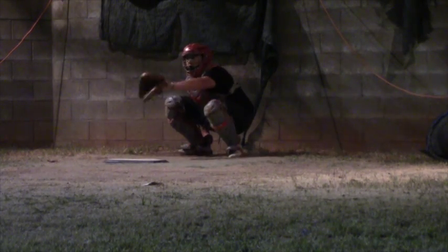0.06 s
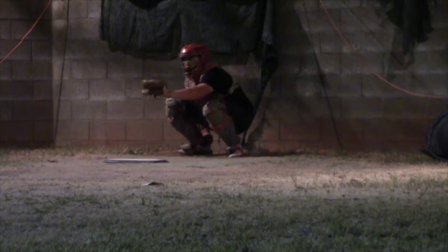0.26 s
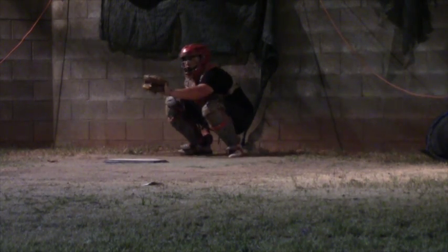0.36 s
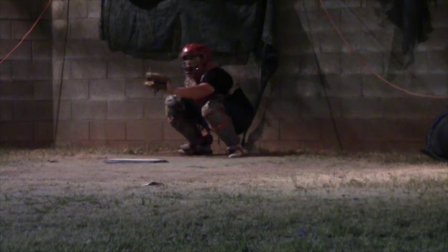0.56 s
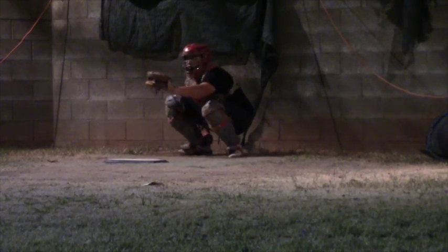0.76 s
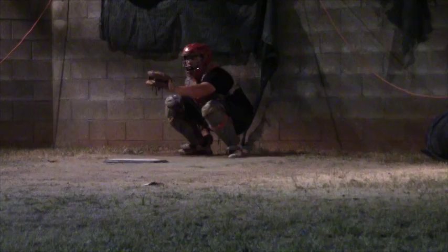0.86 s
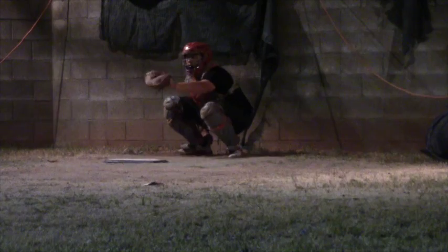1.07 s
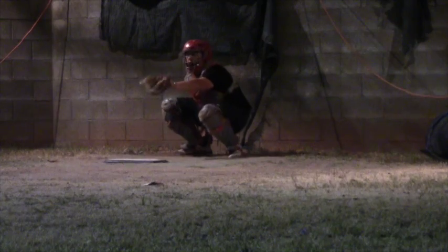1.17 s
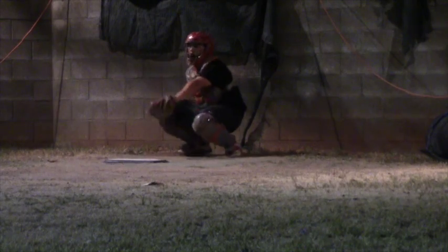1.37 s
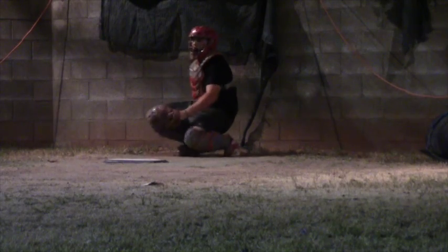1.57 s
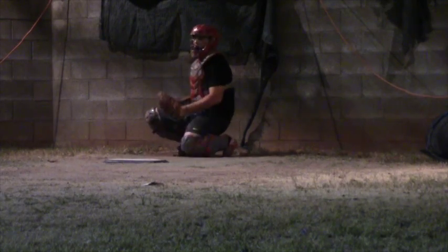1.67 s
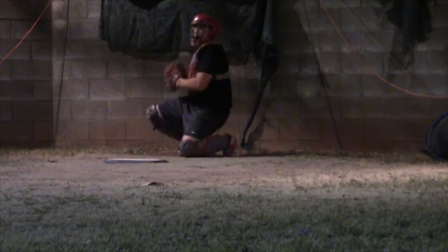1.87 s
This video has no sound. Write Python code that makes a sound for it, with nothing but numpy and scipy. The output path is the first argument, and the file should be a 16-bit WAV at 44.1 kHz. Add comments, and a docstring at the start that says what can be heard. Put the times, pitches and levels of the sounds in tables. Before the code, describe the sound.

Quiet outdoor night hiss with faint crickets, then one sharp baseball-in-mitt pop echoing briefly off ground and wall, followed by small dull gear clacks and tiny cloth rustles, heard from across a yard in stereo.

```python
"""Outdoors at night, crickets (wavering sine chirps, narrow-band noise) sound over distant rumble and hiss (noise).
Then a baseball hits a leather mitt beside a block wall: choked sines thump and snap, noise bursts crack.
Ground and wall repeat it as further rows; the yard scatters it back as lumpy noise; the extra hiss stops.
Light knocks of hard gear (choked sines, noise grain, a short room tail) and rustles (noise bursts) follow."""
import sys
import numpy as np
from scipy import signal
from scipy.fft import rfft, irfft, next_fast_len
from scipy.io import wavfile
from scipy.ndimage import map_coordinates

SR = 44100
rng = np.random.default_rng(int(sys.argv[2]) if len(sys.argv) > 2 else 0)


def int16_out(signal):
    """Quantize to a 16-bit WAV file."""
    q = np.round(np.clip(np.atleast_2d(signal).T, -1, 1) * 32767)
    wavfile.write(sys.argv[1], SR, q.astype(np.int16))


N = 83790

# Night noise colour. Each row: frequency in Hz, relative level in dB.
NIGHT_COLOUR_DB = [(12, -68), (20, -54), (60, -21.5), (120, -4), (172, -6.5), (330, -8.5), (459, -12.5),
                   (574, -14), (802, -17.5), (1810, -26.5), (5680, -36.5), (11100, -42), (16000, -54.5)]
# Night stereo width. Each row: frequency in Hz, side level relative to mid in dB.
NIGHT_SIDE_DB = [(30, -2), (60, -26), (150, -22), (380, -13.5), (950, -11), (2400, -8.5), (3500, -15),
                 (6000, -41), (10000, -11), (15000, -22)]
# Chirps of the nearest cricket. Each row: start in seconds, rms level in dB.
CHIRPS = [(0, -67.5), (.066, -73), (.968, -69.5), (1.052, -70), (1.385, -73), (1.652, -71), (1.718, -70),
          (1.803, -70)]
# Thumps of the mitt's pocket, direct and off ground and walls.
# Each row: start in seconds, peak in dB before filtering, pitch in Hz, ring in cycles.
THUMPS = [(.2372, -7, 388, 1.4), (.2405, -1.5, 626, 1.96), (.2435, -8, 215, 0.74), (.2478, -9, 545, 2.1),
          (.2497, -4, 577, 1.14), (.2535, -12.5, 643, 5.1), (.2630, -28, 625, 1.3),
          (.2677, -13.5, 690, 0.91), (.2745, -22, 423, 1.6), (.2803, -16, 320, 0.72),
          (.3468, -18.5, 523, 1.76), (.3500, -21, 256, 3)]
# Sharp snaps of the leather, direct and off the wall.
# Each row: start in seconds, peak in dB before filtering, pitch in Hz, ring in cycles.
SNAPS = [(.2374, -17.5, 4340, 3.1), (.2404, -5, 3720, 2.7), (.2536, -1, 5530, 0.31)]
# Leather cracks, direct and echoed. Each row: start in seconds, level in dB before envelope and air loss,
# centre in Hz, width in octaves, length in seconds.
CRACKS = [(.2370, -24, 7000, 1.1, 0.00058), (.2390, -20, 4400, 1.2, 0.0046),
          (.2478, -22, 3430, 0.74, 0.0025), (.2538, -18, 6000, 1.2, 0.0012),
          (.2613, -27, 9250, 0.26, 0.0014), (.2650, -26.5, 2820, 0.43, 0.0026),
          (.2690, -34.5, 8550, 0.47, 0.0036), (.4238, -45.5, 7600, 0.14, 0.0016),
          (.4243, -40, 4640, 0.11, 0.0016), (.4200, -55, 5840, 0.47, 0.029),
          (.4340, -45.5, 2600, 0.59, 0.041)]
# Scattered echoes of the catch. Each row: time in seconds, low, mid and treble band levels in dB.
YARD_LEVELS = [(0.236, -36, -26.5, -50), (0.253, -25.5, -31, -34), (0.272, -22.5, -32, -42.5),
               (.304, -33.5, -43.5, -54), (.336, -32.5, -40.5, -57), (.375, -34.5, -44, -59.5),
               (0.444, -41.5, -51.5, -61), (.460, -48, -55.5, -66), (0.552, -55, -57.5, -84),
               (.750, -50.5, -63.5, -92), (.95, -52.5, -63.5, -94), (1.199, -61, -75, -100)]
# Colours of those three bands. Each row: frequency in Hz, relative level in dB.
YARD_LOW_DB = [(59, -55), (100, -16), (254, -4), (355, -8), (607, -6), (1300, -38.5), (1690, -65),
               (2860, -120)]
YARD_MID_DB = [(710, -23), (1200, -10.5), (3430, -11), (5500, -24.5), (7150, -31), (12100, -120)]
YARD_TREBLE_DB = [(3500, -51), (5200, 0.5), (8000, -4), (10500, -9.5), (12500, -25), (15500, -23)]
# Echo stereo width. Each row: frequency in Hz, side level relative to mid in dB.
ECHO_SIDE_DB = [(60, -25), (200, -36), (700, -23), (1600, -25), (4000, -27), (12000, -43)]
# Light knocks of hard gear.
# Each row: start in seconds, peak in dB before filtering, pitch in Hz, ring in cycles.
KNOCKS = [(0.5687, -32, 1480, 2.7), (0.5701, -21, 926, 1.8), (0.5733, -22, 450, 0.63),
          (0.5856, -24.5, 660, 1.2), (.5905, -28.5, 595, 2.2), (0.6098, -39.5, 2350, 0.69),
          (0.6098, -14, 906, 1.02), (.6118, -45, 990, 3), (0.6121, -21.5, 243, 1.74),
          (0.6142, -18.5, 450, 1.37), (0.635, -37, 625, 4), (0.647, -30, 302, 1.3), (0.672, -36, 530, 1.2),
          (.6770, -28, 390, 1.3), (0.689, -29.5, 755, 0.35), (1.0195, -44, 2430, 2.4),
          (1.0199, -34, 1300, 1.2), (1.0195, -25, 677, 3.1), (1.0245, -19.5, 518, 2.4),
          (1.0293, -32.5, 397, 2.5), (1.0335, -28, 520, 1.2), (1.0690, -36.5, 458, 1.7),
          (1.0740, -35, 930, 2.9), (1.085, -37, 930, 0.78), (1.091, -38, 494, 2), (1.106, -38, 440, 1.8),
          (1.3227, -26.5, 790, 2.9), (1.3215, -40, 1490, 1.3), (1.3290, -29, 510, 0.97),
          (1.3325, -34.5, 910, 2), (1.4190, -33.5, 288, 0.66)]
# Gear and cloth rustles. Each row: start in seconds, level in dB before envelope and air loss,
# centre in Hz, width in octaves, length in seconds.
RUSTLES = [(.812, -47, 2490, 0.48, 0.0066), (.865, -57.5, 3700, 0.66, 0.042),
           (1.08, -58.5, 8500, 0.39, 0.0095), (1.45, -54.5, 2120, 0.45, 0.008),
           (1.483, -43, 1220, 0.55, 0.0053), (1.8, -57.5, 3270, 0.58, 0.16)]
# Microphone balance. Each row: frequency in Hz, left over right in dB.
LEFT_LEAN_DB = [(100, .5), (1000, .9), (4000, .05)]

NIGHT_DB, DRIFT_DB, FLUTTER_DB = -48.5, .4, 0.66
EARLY_HISS_DB, EARLY_HISS_EDGE_HZ = -0.5, 1830  # extra hiss until the catch; dB re the night level
CHIRP_HZ, CHIRP_S, CHIRP_RAMP_S = 5565, 0.034, 0.0027
CHORUS_DB, CHORUS_WIDTH_HZ = -78.5, 25
BLOW_LOW_HZ, BLOW_RISE_CYCLES = 154, 0.096  # small objects give no deep bass
THUMP_TOP_HZ, AIR_TOP_HZ = 960, 10500
YARD_RISE_S, YARD_LUMP_DB, YARD_LUMPS_PER_S = 0.0016, 1.1, 150.7
KNOCK_TOP_HZ, KNOCK_ROOM_DB, KNOCK_T60_S, KNOCK_ROOM_DELAY_S = 3970, -11.5, 0.28, .004
GRAIN_DB, GRAIN_PITCH_RATIO, GRAIN_OCTAVES, GRAIN_S = -11, 0.88, 0.64, 0.0052  # dB and ratio re the knock
TOP_HZ, CLIP_TOP = 15900, .95


def amp(db):
    """dB to gain."""
    return 10 ** (np.asarray(db) / 20)


def unit(x):
    """Scale to rms 1."""
    return x / np.sqrt(np.mean(x ** 2) + 1e-20)


def along(points, hz):
    """Interpolate (Hz, value) points on a log frequency axis."""
    f, v = np.transpose(points)
    return np.interp(np.log(hz + 1), np.log(f + 1), v, left=v[0], right=v[-1])


def filtered(x, response):
    """Multiply the spectrum of x by a response of frequency."""
    m = next_fast_len(x.shape[-1] + 8192)
    spectrum = rfft(x, m) * response(np.fft.rfftfreq(m, 1 / SR))
    return irfft(spectrum, m)[..., :x.shape[-1]]


def wobble(knots_per_s):
    """Smooth random curve: a spline through normal random knots."""
    knots = rng.standard_normal(int(N * knots_per_s / SR) + 4)
    return map_coordinates(knots, [np.arange(N) * knots_per_s / SR])


def rush(colour_db, side_db):
    """Stereo noise of rms 1: a shared mid plus an unrelated side, opposite in the two channels."""
    def response(hz):
        return amp(along(colour_db, hz) + [0 * hz, along(side_db, hz)])

    mid, side = filtered(rng.standard_normal((2, N)), response)
    return unit(np.array([mid + side, mid - side]))


def blows(rows, top_hz, order):
    """Struck sines: swell in a fraction of a cycle, choked by a Gaussian decay, band-limited."""
    out, t = np.zeros(N + SR), np.arange(SR // 10) / SR
    for start_s, peak_db, hz, cycles in rows:
        swell = 1 - np.exp(-t * hz / BLOW_RISE_CYCLES)
        shape = swell * np.exp(-(t * hz / max(cycles, .2)) ** 2)
        at = round(start_s * SR)
        out[at:at + len(t)] -= amp(peak_db) * shape / shape.max() * np.sin(2 * np.pi * hz * t)
    lowpass = signal.butter(order, min(top_hz, SR / 2.2), fs=SR, output="sos")
    highpass = signal.butter(2, BLOW_LOW_HZ, "high", fs=SR, output="sos")
    return signal.sosfilt(highpass, signal.sosfilt(lowpass, out[:N]))


def bursts(rows, rise):
    """Noise bands that swell over a share (rise) of their length, then die; air dulls the top."""
    out, t = np.zeros(N + SR), np.arange(SR // 4) / SR
    for start_s, db, hz, octaves, length_s in rows:
        band = filtered(rng.standard_normal(len(t)),
                        lambda f: np.exp(-.5 * (np.log2((f + 1) / hz) / octaves) ** 2))
        shape = (1 - np.exp(-t / (rise * length_s))) * np.exp(-(t / length_s) ** 2)
        at = round(start_s * SR)
        out[at:at + len(t)] += amp(db) * unit(band * shape) * np.sqrt(np.mean(shape ** 2))
    return filtered(out[:N], lambda f: 1 / (1 + (f / AIR_TOP_HZ) ** 6))


def night():
    """Distant rumble and hiss, drifting a little; extra treble hiss stops at the catch."""
    drift = amp(DRIFT_DB * wobble(0.98) + FLUTTER_DB * wobble(25.06))
    steady = drift * rush(NIGHT_COLOUR_DB, NIGHT_SIDE_DB)
    hiss = filtered(rush(NIGHT_COLOUR_DB, NIGHT_SIDE_DB),
                    lambda hz: hz ** 2 / (hz ** 2 + EARLY_HISS_EDGE_HZ ** 2))
    before_catch = np.arange(N) / SR < min(THUMPS)[0]
    return amp(NIGHT_DB) * (steady + amp(EARLY_HISS_DB) * hiss * before_catch)


def crickets():
    """Short, slightly phase-wavering sine whistles over a narrow-band noise chorus on the same pitch."""
    t = np.arange(N) / SR
    level = np.zeros(N)
    for start_s, db in CHIRPS:
        edge_s = np.minimum(t - start_s, start_s + CHIRP_S - t)
        level += amp(db) * np.clip(edge_s / CHIRP_RAMP_S, 0, 1)
    near = np.sqrt(2) * level * np.sin(2 * np.pi * CHIRP_HZ * t + .5 * wobble(41.1))
    chorus = filtered(rng.standard_normal(N),
                      lambda f: np.exp(-.5 * ((f - CHIRP_HZ) / CHORUS_WIDTH_HZ) ** 2))
    return near + amp(CHORUS_DB) * unit(chorus)


def yard():
    """Scattered echoes: three lumpy noise bands, each fading at its own pace."""
    times_s, *band_levels_db = np.transpose(YARD_LEVELS)
    t = np.arange(N) / SR
    out = np.zeros((2, N))
    for levels_db, colour_db in zip(band_levels_db, (YARD_LOW_DB, YARD_MID_DB, YARD_TREBLE_DB)):
        fade_db = np.interp(t, times_s, levels_db, right=-120)
        lumps_db = YARD_LUMP_DB * wobble(YARD_LUMPS_PER_S)
        out += amp(fade_db + lumps_db) * rush(colour_db, ECHO_SIDE_DB)
    return np.clip((t - times_s[0]) / YARD_RISE_S, 0, 1) * out


def catch():
    """Ball into mitt: hollow pocket thumps, leather snaps and noise cracks, with their echoes."""
    thumps = blows(THUMPS, THUMP_TOP_HZ, order=4)
    snaps = blows(SNAPS, AIR_TOP_HZ, order=4)
    return thumps + snaps + bursts(CRACKS, rise=0.053)


def knocks():
    """Hard gear: choked sines with a noise rattle, plus the wall's short answer as a decaying noise tail."""
    grain_rows = [(start_s, db + GRAIN_DB, hz * GRAIN_PITCH_RATIO, GRAIN_OCTAVES, GRAIN_S)
                  for start_s, db, hz, _ in KNOCKS]
    direct = blows(KNOCKS, KNOCK_TOP_HZ, order=1) + bursts(grain_rows, rise=0.076)
    t = np.arange(SR // 3) / SR
    tail = rush([(100, 0.0057), (3000, 0)], ECHO_SIDE_DB)[:, :len(t)]  # all but flat
    tail = tail * amp(-60 * t / KNOCK_T60_S) * (t > KNOCK_ROOM_DELAY_S)
    room = signal.fftconvolve(direct[None], tail / np.linalg.norm(tail[0]), axes=1)[:, :N]
    return direct + amp(KNOCK_ROOM_DB) * room


def rustles():
    """Gear and cloth: soft noise bursts."""
    return bursts(RUSTLES, rise=0.25)


def scene():
    """Sum of all sources at the microphone."""
    return catch() + yard() + knocks() + rustles() + crickets() + night()


def record(dry):
    """Microphone: soft clip, slight left lean by frequency, band limit."""
    soft = dry / (1 + (dry / CLIP_TOP) ** 8) ** (1 / 8)

    def response(hz):
        lean_db = np.outer([.5, -.5], along(LEFT_LEAN_DB, hz))  # half to each channel
        return amp(lean_db) * (hz < TOP_HZ)

    return filtered(soft, response)


dry = scene()
out = record(dry)
int16_out(out)
```